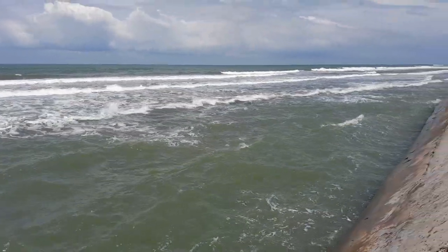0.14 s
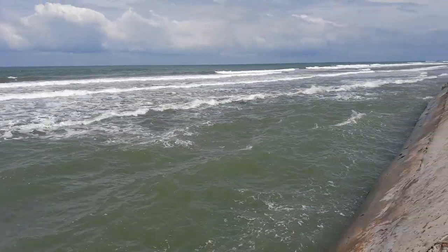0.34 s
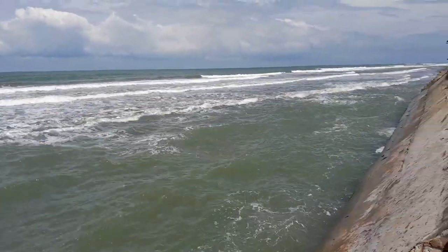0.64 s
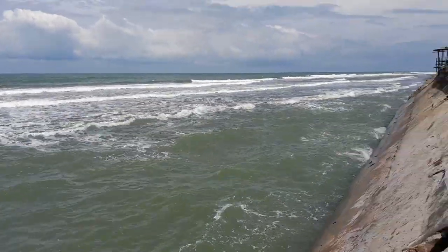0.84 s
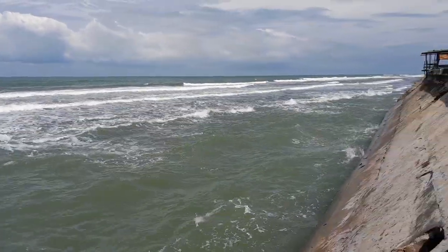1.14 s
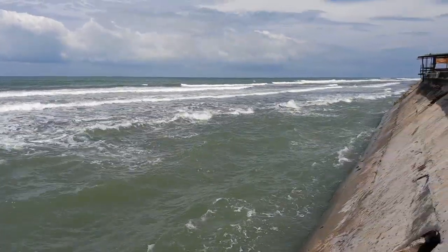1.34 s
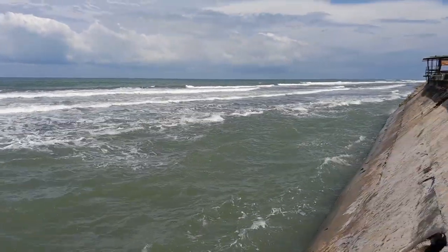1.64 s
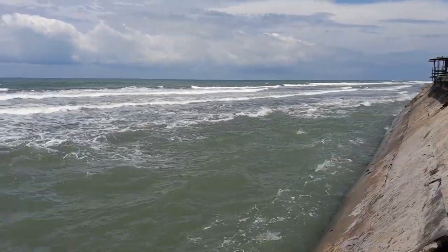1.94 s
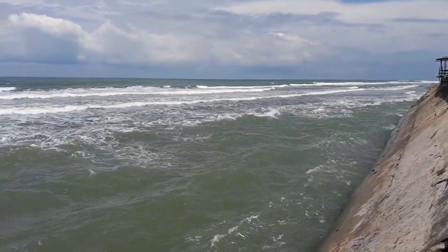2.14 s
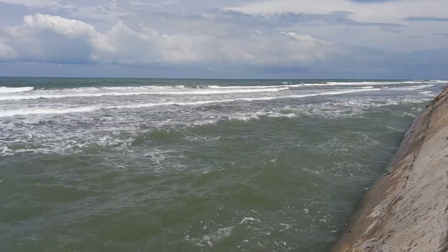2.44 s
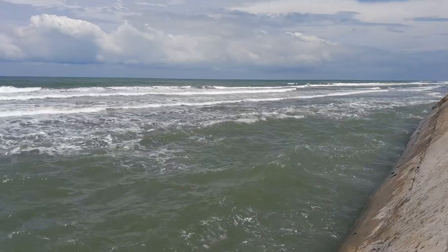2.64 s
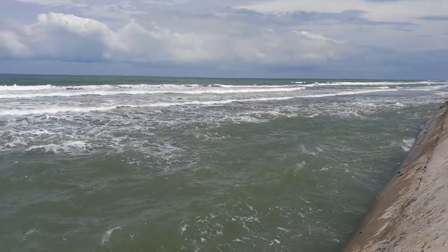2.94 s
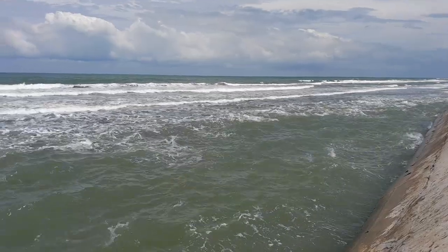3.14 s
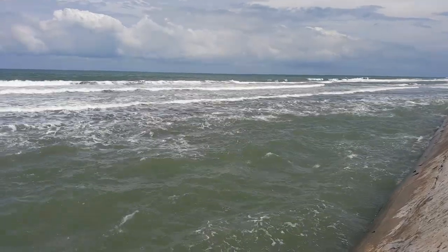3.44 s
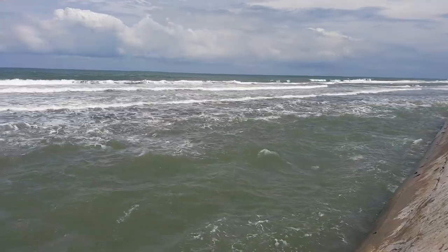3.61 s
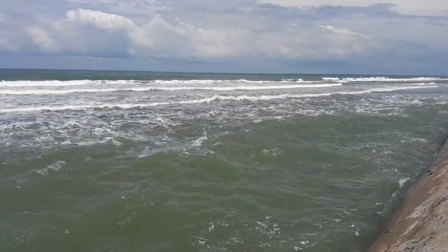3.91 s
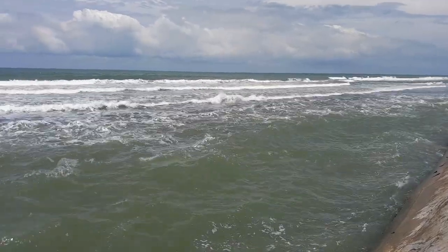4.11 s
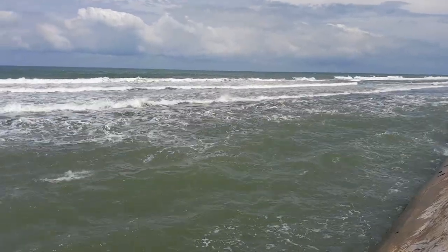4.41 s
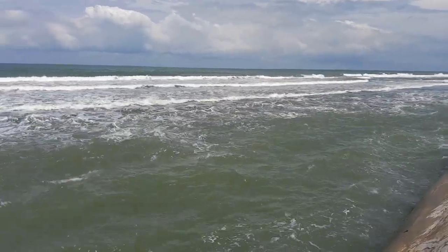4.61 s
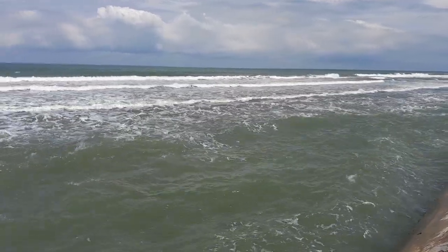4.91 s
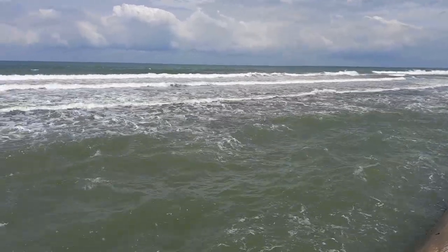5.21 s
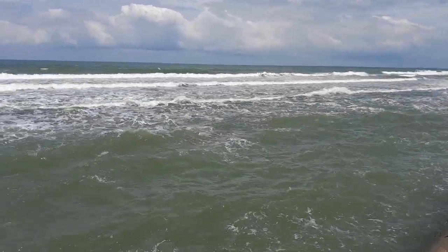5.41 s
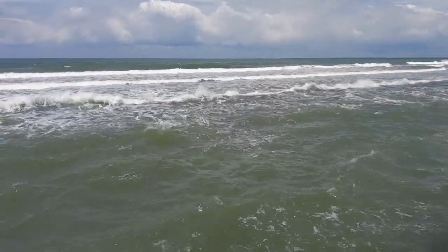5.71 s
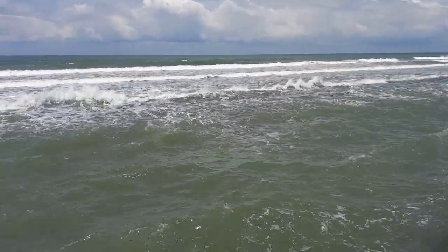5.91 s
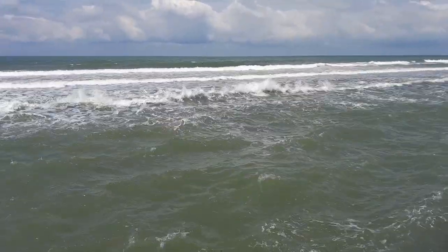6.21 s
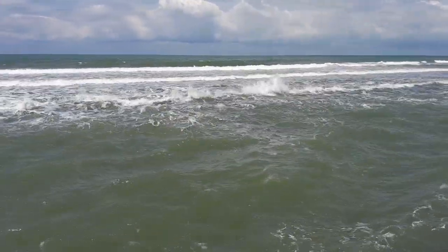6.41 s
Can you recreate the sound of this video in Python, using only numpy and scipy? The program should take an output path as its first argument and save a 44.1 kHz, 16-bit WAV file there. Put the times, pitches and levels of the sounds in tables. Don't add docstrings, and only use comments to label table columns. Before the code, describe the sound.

Gusty wind buffets and crackles hard across a small stereo microphone while rough surf hisses steadily behind it beside a seawall.

```python
import sys
import numpy as np
from scipy import signal
from scipy.fft import rfft, irfft
from scipy.io import wavfile
from scipy.ndimage import uniform_filter1d

SR = 44100
rng = np.random.default_rng(int(sys.argv[2]) if len(sys.argv) > 2 else 0)


def digitize_waveform(pressure):
    field = np.atleast_2d(pressure).T
    bounded = np.clip(field, -1, 1)
    quanta = np.round(bounded * 32767).astype(np.int16)
    wavfile.write(sys.argv[1], SR, quanta)


def attenuation_scalar(level_db):
    decades = np.asarray(level_db, float) / 20
    return 10 ** decades


N = 288855
COARSE = 64

# [t/s, foam level/dB, body of the breakers above it/dB]
SURF = [(0.0, -51, -2), (0.6, -52.5, -1), (0.95, -52, -1.5), (1.29, -51.5, -1.5), (1.97, -56.5, -2),
        (2.81, -53.5, -1), (3.14, -55.5, -2), (3.7, -57, -1.5), (4.16, -59.5, -4.5), (4.47, -54, -1),
        (4.78, -59, -2), (5.05, -55.5, -0.5), (5.5, -58, -2), (5.78, -52, -1), (5.95, -48.5, -1),
        (6.04, -51, -2), (6.35, -48.5, -3), (6.55, -52, -1.5)]
# [start of hold t/s, hold/s, foam level/dB]
SLAPS = [
    (0.69, 0.0087, -52.5),
    (0.89, 0.12, -53.5),
    (2.09, 0.0081, -57),
    (3.72, 0.0088, -57.5),
    (5.49, 0.0055, -57),
    (6.24, 0.016, -54.5),
]
# [f/Hz, level per Hz/dB]
SURF_TONE = [(150, 11), (500, 8), (900, 6), (1300, -0.5), (1800, 2.5), (2200, 5.5), (2550, 2.5),
             (2950, -5.5), (4100, 0), (4600, -5.5), (6000, -9), (8100, -13.5), (8800, -19.5),
             (15500, -19.5)]
# [f/Hz, width/Hz, level/dB]
HISS_PEAKS = [(4310, 260, 0.5), (5470, 100, 3), (7900, 130, 1)]
# [f/Hz, share]
BODY_SHARE = [(700, 0.5), (1400, 4), (2300, 1.27), (4000, 6.5), (6500, -1), (9500, -0.1), (14000, -1.74)]
# [t/s, buffeting level/dB, sharpness of its top/dB]
STEADY_WIND = [(0.0, -32, -6), (0.55, -33.5, -12.5), (1.05, -32.5, -9.5), (1.25, -26, -11),
               (1.53, -39, -4.5), (1.75, -35, -6), (1.93, -44, 0), (2.3, -38.5, -4), (2.7, -32, -12.5),
               (3.1, -27, -10), (3.55, -23, -11), (3.8, -36.5, -7), (4.45, -44, -4), (4.7, -38.5, 2.5),
               (5.0, -59, 3.5), (5.4, -43, 2), (6.0, -41, 3.5), (6.5, -37.5, 1)]
# [start of hold t/s, hold/s, buffeting level/dB, sharpness/dB]
GUSTS = [(0.0, 0.0063, -33, -13), (0.204, 0.0076, -23, -12), (0.285, .01, -25, -31),
         (0.404, 0.063, -21.5, -17), (0.67, 0.0093, -34.5, 1.5), (0.788, 0.047, -23, -11),
         (1.151, 0.02, -30, 0.5), (1.304, 0.035, -19.5, -24), (1.412, 0.051, -24.5, -23),
         (1.622, 0.032, -32, -26), (1.815, 0.029, -23.5, -12), (2.005, 0.17, -30, -14),
         (2.3, 0.062, -29, -27), (2.471, .003, -17.5, -16), (2.783, 0.038, -19.5, -16),
         (2.935, .005, -36, -18), (3.016, 0.099, -16, -13.5), (3.252, 0.06, -20, -19),
         (3.38, 0.084, -21, -26), (3.746, 0.023, -21, -14), (3.864, 0.084, -16.5, -12.5),
         (4.063, 0.19, -17.5, -9.5), (4.307, .2, -17.5, -10.5), (4.773, 0.0079, -37, -14),
         (5.235, 0.021, -34, -1), (5.564, .01, -37, -14), (5.84, .005, -37, -12), (6.009, 0.053, -26, 5.5),
         (6.23, 0.03, -47, 7)]
# [f/Hz, level per Hz/dB]
BUFFET_TONE = [(88, -36), (150, -10.5), (304, 1), (400, 4), (517, -2.5), (1270, -15.5), (1780, -22.5),
               (3500, -34.5), (7000, -67), (9100, -79), (15400, -120)]
# [t/s, peak level/dB, sharpness/dB, left-right/dB]
EDDIES = [(0.647, -24, -21, 5), (0.668, -8.5, -35.5, 2), (0.821, -15, -38.5, 5), (1.12, -5, -14, -4),
          (1.155, -6, -18, 0.5), (1.281, -6.5, -39.5, -3), (1.319, -1.5, -23, -3), (1.712, -8.5, -16.5, -6),
          (2.508, -5, -28, 0.5), (2.762, -9.5, -37, -0.5), (2.93, -6.5, -32, 0.5), (3.23, -7, -17.5, 0),
          (3.358, -2, -20, 2), (3.389, -7.5, -12.5, -7), (3.564, -7, -22, -1), (3.763, -14.5, -3, -5),
          (3.847, -5, -31, -8), (3.89, -4, -16.5, -4), (3.908, -7, -27, 6.5), (3.971, -5, -14.5, -1),
          (4.048, -3, -27.5, -4), (4.192, -11, -2.5, -9), (4.434, -5.5, -7, -1), (4.654, -15.5, -10, -4),
          (4.913, -18, -16, 0), (5.4, -15.5, -15, -3), (5.932, -10, -18.5, -1), (6.06, -12.5, -6.5, 0.5),
          (6.155, -11, -13, 2.5), (6.309, -13, -8, -2)]
# [t/s, peak level/dB]
PUFFS = [(1.106, -13), (2.743, -26), (2.863, -9.5), (3.281, -27), (3.609, -12.5), (4.094, -12), (4.145, -8),
         (4.35, -28), (4.55, -31), (4.569, -17.5), (4.625, -19), (4.745, -23), (4.788, -29), (5.225, -24),
         (5.293, -20.5), (5.419, -16.5), (5.472, -30), (5.565, -18), (5.606, -34), (5.666, -20),
         (5.805, -26), (5.89, -16.5), (5.989, -11), (6.026, -16), (6.095, -11), (6.202, -12),
         (6.269, -14.5), (6.531, -14.5)]
# [t/s, peak level/dB, port (0 left, 1 right)]
POPS = [(1.1268, -18, 1), (1.305, -21, 1), (2.1703, -20, 1), (2.825, -13.5, 1), (3.0154, -28, 1),
        (3.0821, -24, 1), (3.0983, -19, 1), (3.1016, -16, 0), (3.247, -13.5, 1), (3.266, -20, 0),
        (3.3625, -24, 0), (3.396, -23, 1), (3.584, -23, 1), (3.6158, -24, 1), (3.7082, -16, 1),
        (3.7474, -26, 1), (3.772, -18, 1), (3.8547, -14, 1), (3.8753, -14.5, 0), (3.9065, -16, 1),
        (3.9422, -29, 0), (3.98, -32, 1), (4.055, -18, 1), (4.1124, -18.5, 1), (4.149, -24, 1),
        (4.1929, -18, 0), (4.2167, -20, 1), (4.251, -17.5, 1), (4.318, -23, 1), (4.3603, -19, 1),
        (4.3994, -15, 1), (4.44, -13, 1), (4.4978, -11, 1), (4.5076, -13.5, 1), (4.5534, -19, 1),
        (5.79, -25, 1), (5.808, -19, 1), (5.863, -22, 1), (5.896, -22, 1), (6.0103, -13, 0),
        (6.0142, -13.5, 1), (6.0632, -11, 1), (6.158, -17, 1), (6.2339, -14, 1), (6.316, -20, 1),
        (6.368, -16.5, 1)]
# [t/s, peak level/dB, pitch f/Hz, left-right/dB]
WHORLS = [(0.037, -16, 550, -2), (0.087, -32, 603, 0), (0.384, -15.5, 560, -11), (0.423, -36, 570, -10),
          (0.446, -32, 625, -10), (0.647, -12.5, 587, 0), (0.668, -14.5, 560, 0.5), (0.755, -25, 650, -17),
          (0.779, -29, 622, 12), (0.827, -23, 610, 9), (0.887, -19.5, 694, 2), (1.109, -17, 890, -1),
          (1.124, -13, 710, -1), (1.154, -25, 590, 5), (1.199, -21.5, 790, 4), (1.27, -27, 605, 8),
          (1.283, -13, 780, 3), (1.303, -15, 829, -11), (1.322, -9, 568, -1.5), (1.389, -26, 596, -10),
          (1.43, -39, 563, -1.5), (1.717, -17, 576, -2), (2.087, -27, 800, -8), (2.167, -20.5, 720, -5),
          (2.481, -23, 660, 4), (2.511, -26, 550, 11), (2.712, -18, 1280, 5), (2.744, -16, 564, -6),
          (2.766, -9.5, 645, 1), (2.805, -25, 660, -9), (2.833, -7.5, 570, -2), (2.864, -31, 555, 0),
          (2.94, -16, 668, 8), (2.982, -33, 550, 2), (3.0, -14.5, 720, -1), (3.044, -15, 540, 13),
          (3.096, -8.5, 792, 0), (3.21, -18, 680, 3), (3.246, -9.5, 540, 5), (3.282, -7, 530, 0),
          (3.309, -16, 720, -12), (3.346, -35, 810, -5), (3.36, -16, 570, 9), (3.407, -19, 783, 4),
          (3.467, -16, 624, -6), (3.563, -33, 554, -3), (3.613, -30, 546, 2), (3.706, -31, 620, 3),
          (3.706, -37, 619, -4), (3.743, -20, 870, -7.0), (3.765, -42, 552, -4), (3.834, -18, 780, -6),
               (3.87, -14, 740, 0), (3.939, -20, 630, -4), (3.974, -6, 553, -1), (4.041, -13, 563, -8),
               (4.052, -13, 646, -8), (4.103, -27, 560, -11), (4.136, -19, 586, 5), (4.191, -19, 584, -1.0),
               (4.216, -4, 610, 6), (4.293, -19, 563, -8), (4.318, -23, 530, 0), (4.35, -15, 560, 0),
               (4.38, -11, 552, -3.0), (4.399, -7.5, 717, -1.0), (4.425, -8, 596, -10),
               (4.48, -13.5, 784, 7), (4.552, -28, 756, -10), (4.57, -20, 1100, -2),
               (4.627, -16.5, 760, -4), (4.662, -15, 760, -5), (4.746, -24, 770, -1.0),
               (4.789, -20, 780, 4), (4.921, -23, 770, -8), (5.088, -23.5, 687, -1), (5.225, -26, 542, -1),
               (5.401, -21, 755, 15), (5.452, -19.5, 814, -7), (5.474, -22.5, 970, -6),
               (5.561, -22, 1030, -3), (5.607, -22.5, 740, -7), (5.789, -27, 740, -10),
               (5.806, -27, 694, -9), (5.859, -30, 546, -2), (5.889, -18.5, 790, -4),
               (5.932, -10, 730, 6.5), (5.988, -14.5, 740, -2), (6.0, -9.5, 1050, -4),
               (6.025, -8.5, 1134, 0), (6.06, -17, 710, -1), (6.097, -9, 915, 4), (6.155, -15, 655, -4),
               (6.205, -27, 790, -1), (6.231, -15, 734, 1), (6.313, -12.5, 1015, -4),
               (6.36, -22, 785, -4.5), (6.53, -21, 850, -12)]
# [t/s, peak level/dB, pitch f/Hz, left-right/dB]
THUMPS = [(0.004, -20.5, 105, 6), (0.153, -30, 72.7, -1), (0.657, -22, 180, 3), (0.881, -25, 82, 9),
          (1.121, -22, 98, 1), (1.274, -22, 246, -6), (2.117, -15.5, 91, 1), (2.454, -10.5, 137.4, 1.5),
          (2.633, -19.5, 72, -3), (2.869, -24, 102, -6), (2.994, -17.5, 132, 3.5), (3.306, -26, 87, 6),
          (3.882, -32, 128, -2), (4.032, -14.5, 154, 5), (4.397, -14.5, 108, -2), (4.542, -22, 193, 13.5),
          (4.643, -20, 186, -5), (4.781, -20.5, 150.6, 0), (4.809, -31, 68, 0), (4.916, -30, 85.5, 6.0),
          (5.128, -21.5, 152, 2), (5.222, -31, 72, 17), (5.396, -24, 153, 0), (5.726, -35, 106, -10),
          (5.861, -25, 81, 5), (6.015, -16, 116, 8), (6.105, -25, 107, 0), (6.153, -23, 71, 16)]
# [t/s, peak level/dB]
DROPS = [
    (3.275, -25),
]
# [start of hold t/s, hold/s, level/dB, left-right/dB]
LUMPS = [(0.004, 0.024, -30.5, -6), (0.174, 0.11, -29.5, 4), (0.37, 0.027, -26.5, 2),
         (0.643, 0.053, -29.5, -5), (0.734, 0.07, -31.5, 0), (0.874, 0.029, -32.5, -11),
         (0.957, 0.091, -38, -5), (1.113, 0.33, -30, 8.5), (1.677, 0.032, -31, -10), (1.71, 0.072, -32, 11),
         (1.797, 0.056, -30, 2), (2.04, 0.078, -35, -9), (2.235, 0.026, -35.5, 8), (2.298, 0.067, -29, -7),
         (2.462, 0.042, -26.5, -8), (2.627, 0.03, -37, 3), (2.765, 0.13, -27.5, 6.5),
         (2.99, 0.14, -23.5, -1), (3.198, 0.055, -30.5, -10), (3.29, 0.15, -29, -7.5),
         (3.458, 0.23, -30, -1), (3.736, 0.048, -30.5, 6), (3.863, 0.13, -28, -1.0), (3.97, 0.033, -29, -3),
         (4.043, 0.049, -36, 2.0), (4.09, 0.26, -24.5, -1.5), (4.353, 0.1, -31, 1.5),
         (4.477, 0.038, -30.5, -8.5), (4.537, 0.034, -32, 10), (4.765, 0.05, -33, 9),
         (5.757, 0.064, -31, 0), (5.872, 0.28, -28, 1.5), (6.11, 0.051, -33.5, 12), (6.25, 0.026, -29, 4),
         (6.293, 0.025, -25, -4)]
# [f/Hz, level per Hz/dB]
RUMBLE_TONE = [(15, -39), (25, -10.5), (75, 3), (123, -1), (194, -9.5), (260, -11), (340, -34), (570, -120)]


def surf(foam_db, body_db):
    white = rng.standard_normal((3, N))
    shared = np.array([white[2], np.roll(white[2], 23)])
    hz = np.maximum(np.arange(N // 2 + 1) * SR / N, 10)
    tone_db = at_hz(SURF_TONE, hz) - at_hz(SURF_TONE, 9600)
    peaks_db = sum(db * np.exp(-((hz - top) / width) ** 2) for top, width, db in HISS_PEAKS)
    spectrum = rfft(white[:2] + 0.36 * shared) * attenuation_scalar(tone_db + peaks_db)
    centres, shares = np.transpose(BODY_SHARE)
    out, swell = 0, drift(24)
    for only, share in zip(np.eye(len(shares)), shares):
        flicker_db = 0.9 * swell + (1.94 + 0.22 * share) * drift(43) + 0.75 * drift(1.5)
        part = irfft(spectrum * np.sqrt(np.interp(hz, centres, only)), N)
        out = out + attenuation_scalar(share * body_db + flicker_db) * part
    return attenuation_scalar(foam_db + 1.5) * out


def surf_levels():
    foam_db, body_db = in_time(SURF)
    slaps = swells(SLAPS, rise_db_per_s=203, fall_db_per_s=144)
    return 10 * np.log10(attenuation_scalar(2 * foam_db) + fine(slaps.sum(axis=0))), body_db


def wind():
    calm_db, calm_sharp_db = in_time(STEADY_WIND)
    gusts = swells(GUSTS, rise_db_per_s=273, fall_db_per_s=285)
    gust_sharpness = attenuation_scalar(2 * np.array(GUSTS)[:, 3])
    body = attenuation_scalar(2 * calm_db) + fine(gusts.sum(axis=0))
    top = attenuation_scalar(2 * (calm_db + calm_sharp_db)) + fine(gust_sharpness @ gusts)
    return 10 * np.log10(body), 10 * np.log10(top / body)


def buffeting(level_db, sharp_db):
    shared_burst = 0.72 * drift(62) + 1.38 * drift(130)
    burst = shared_burst + np.array([2.0 * drift(55), 3.14 * drift(43)])
    snap = snaps(per_s=49.0, decay_s=0.0019)
    power, sharp, knock = eddies()
    gust = attenuation_scalar(18.0) * np.sqrt(attenuation_scalar(level_db + 1.2 * sharp_db + burst) ** 2 + 0.19 * sharp)
    out, neighbour = 0, drift(30)
    for hz, noise in bands(132.2, count=11):
        top = np.clip(np.log2(hz / 600) / 0.72, 0, 1)
        patch = drift(27.4)
        own = attenuation_scalar(level_db - 4.5 + burst + 2.54 * (patch + neighbour)) ** 2
        neighbour = patch
        low = own * (1 + 2.0 * snap) + power
        high = own * attenuation_scalar(sharp_db + 10.5) ** 2 * (0.59 + 5.0 * snap) + sharp * (1 + 1.3 * snap)
        if hz < 1000:
            noise = evened(noise, hz)
        out = out + attenuation_scalar(at_hz(BUFFET_TONE, hz) + 18.0) * np.sqrt((1 - top) * low + top * high) * noise
    return filtered(out + attenuation_scalar(7.5) * knock + crackle(gust, per_s=130.0), 4, 7000)


def eddies():
    power, sharp, knock = np.zeros((3, 2, N))
    t = np.arange(SR // 10) / SR
    wind_s, _, wind_sharp_db = np.transpose(STEADY_WIND)
    rows = list(EDDIES)
    for s, db in PUFFS:
        rows.append((s, db + 0.5, -12.5 + 0.73 * np.interp(s, wind_s, wind_sharp_db), 0))
    rise, slow_rise = rounded_rise(t, 0.0012), rounded_rise(t, 0.0048)
    for (s, peak_db, sharp_db, pan_db), chance in zip(rows, rng.random((len(rows), 6))):
        length_s = max(0.01 * 2 ** (0.69 * (chance[0] - chance[3])), .002)
        for port, (late, pitch, push) in enumerate(chance.reshape(2, 3)):
            at = int((s + 0.0026 * late) * SR)
            end = min(len(t), N - at)
            gain = attenuation_scalar(peak_db - 8.5 + pan_db * (1.0 - port))
            top_gain = gain * attenuation_scalar(sharp_db + 22.5)
            cavity_hz = 380 * 2 ** (.9 * pitch + (sharp_db + 24.5) / 25)
            ring = np.exp(-t * cavity_hz / 1.58) * np.sin(2 * np.pi * cavity_hz * t)
            power[port, at:at + end] += (gain ** 2 * rise * np.exp(-2 * t / length_s))[:end]
            sharp[port, at:at + end] += (top_gain ** 2 * slow_rise * np.exp(-3.5 * t / length_s))[:end]
            knock[port, at:at + end] += (gain * np.sign(push - .5) * rise * ring)[:end]
    return power, sharp, knock


def snaps(per_s, decay_s):
    born = (rng.random((2, N)) < per_s / SR) * np.minimum(rng.exponential(1, (2, N)), 3)
    fall, rise = np.exp(-1 / (decay_s * SR)), np.exp(-1.6 / (decay_s * SR))
    jumps = signal.lfilter([1], [1, -fall], born + 1e-18)
    return signal.lfilter([1 - rise], [1, -rise], jumps)


def crackle(gust, per_s):
    born = rng.random((2, N)) < per_s * np.array([[.5], [1.3]]) / SR
    steps = gust * born * attenuation_scalar(2.8 * np.minimum(rng.exponential(1, (2, N)), 2))
    sign = rng.choice([-1, 1], (2, N))
    steps = steps * sign + 1e-18
    cavity = filtered(steps, 1, [450, 900], "band")
    steps = filtered(steps, 1, [350, 1300], "band") + attenuation_scalar(8.0) * cavity
    return filtered(steps, 2, 2300) + loud_pops(sign)


def loud_pops(sign):
    s, peak_db, port = np.transpose(POPS)
    pops = np.full((2, N), 1e-18)
    pops[(port > .5).astype(int), ((s - .0008) * SR).astype(int)] = attenuation_scalar(peak_db + 25.5)
    tearing = signal.lfilter([1], [1, -np.exp(-1 / (0.0012 * SR))], pops)
    pops = filtered((pops + 0.24 * tearing) * sign, 1, [550, 1700], "band")
    return filtered(pops, 2, 3000)


def whorls(rows, gain_db, cycles, rise_s):
    out, t = np.zeros((2, N + SR)), np.arange(SR // 16) / SR
    for (s, peak_db, hz, pan_db), chance in zip(rows, rng.random((len(rows), 2, 4))):
        phase, over_phase, over, longer = chance.T[:, :, None]
        phase = phase[0] + np.array([[0], [np.sign(phase[1, 0] - .5) / 4]])
        length_s = cycles / hz * 2 ** (longer - .5)
        fade = np.exp(-(np.maximum(t - rise_s, 0) / length_s) ** 2)
        turns = hz * t * (1 + 0.15 * (1 - t / (2 * length_s)))
        overtone = np.sin(2 * np.pi * ((1.47 + 0.812 * over) * turns + over_phase))
        wave = np.sin(2 * np.pi * (turns + phase)) + attenuation_scalar(-9.5) * overtone
        gain = attenuation_scalar(peak_db + gain_db + pan_db * np.array([[.5], [-.5]]))
        at = int(s * SR)
        out[:, at:at + len(t)] += gain * rounded_rise(t, rise_s) * fade * wave
    return out[:, :N]


def spray_drop():
    ticks = np.zeros((2, N))
    for s, peak_db in DROPS:
        at = round(s * SR)
        gain = attenuation_scalar(peak_db + np.array([[7.0], [5.0]]))
        ticks[:, at:at + 200] = gain * np.exp(-np.arange(200) / 50) * rng.standard_normal((2, 200))
    return filtered(ticks + 1e-18, 2, [4600, 7800], "band")


def pressure_lumps():
    lumps = swells(LUMPS, rise_db_per_s=500, fall_db_per_s=504)
    calm = attenuation_scalar(2 * -42.5)
    power = calm + fine(lumps.sum(axis=0))
    lean = fine(np.array(LUMPS)[:, 3] @ lumps) + calm * 11.5 * drift(7.0)
    return 10 * np.log10(power), lean / power


def rumble(level_db, pan_db):
    wander_db = np.array([1.4 * drift(26.0), 2.5 * drift(3.6)]) + 2.5 * drift(35)
    noise = sum(attenuation_scalar(at_hz(RUMBLE_TONE, hz)) * evened(band, hz) for hz, band in bands(25.4, count=7))
    return attenuation_scalar(level_db + 2.0 + pan_db * [[.5], [-.5]] + wander_db) * rms_one(noise)


def rms_one(x):
    return x / np.sqrt(np.mean(x ** 2) + 1e-20)


def filtered(x, order, hz, kind="low"):
    return signal.sosfilt(signal.butter(order, hz, kind, fs=SR, output="sos"), x)


def rounded_rise(t, rise_s):
    return np.sin(np.pi / 2 * np.minimum(t / rise_s, 1)) ** 2


def in_time(rows):
    s, *columns = np.transpose(rows)
    return [np.interp(np.arange(N) / SR, s, c) for c in columns]


def at_hz(points, hz):
    point_hz, point_db = np.transpose(points)
    return np.interp(np.log(hz), np.log(point_hz), point_db)


def drift(rate):
    r = np.exp(-40 * np.pi * rate / SR)
    slow = signal.lfilter([1], [1, -2 * r, r * r], rng.standard_normal(N // 20 + 2002))[2000:]
    return np.interp(np.arange(N) / 20, np.arange(len(slow)), rms_one(slow))


def bands(low_hz, count):
    white = rng.standard_normal((2, 2, N))
    for k in range(count):
        low = low_hz * 2 ** (k / 2)
        high = min(low_hz * 2 ** ((k + 1) / 2), SR * 9 / 20)
        yield np.sqrt(low * high), filtered(white[k % 2], 2, [low, high], "band")


def evened(band, hz):
    power = np.abs(uniform_filter1d(band ** 2, int(5.16 * SR / hz) + 1)) / np.mean(band ** 2)
    return np.std(band) * rms_one(band / (power + .05) ** (0.86 / 2))


def swells(rows, rise_db_per_s, fall_db_per_s):
    t, out = np.arange(0, N + COARSE, COARSE) / SR, []
    for s, hold, db, *_ in rows:
        climb = rise_db_per_s * np.maximum(s - t, 0)
        fall = fall_db_per_s * np.maximum(t - s - hold, 0)
        out.append(attenuation_scalar(2 * (db - climb - fall)))
    return np.array(out)


def fine(coarse):
    return np.interp(np.arange(N) / COARSE, np.arange(len(coarse)), coarse)


def scene():
    whistles = whorls(WHORLS, gain_db=-4, cycles=3.24, rise_s=0.0025)
    thumps = whorls(THUMPS, gain_db=2, cycles=1.28, rise_s=.012)
    sea = surf(*surf_levels()) + spray_drop()
    return sea + buffeting(*wind()) + whistles + thumps + rumble(*pressure_lumps())


def roll_off(x):
    return signal.sosfilt(signal.butter(12, 15690, fs=SR, output="sos"), x)


def record(dry):
    rounded = .96 * np.tanh(dry / 1.13)
    cut = signal.ellip(10, .5, 60, 15800, fs=SR, output="sos")
    return roll_off(signal.sosfilt(cut, rounded))


dry = scene()
out = record(dry)
digitize_waveform(out)
```